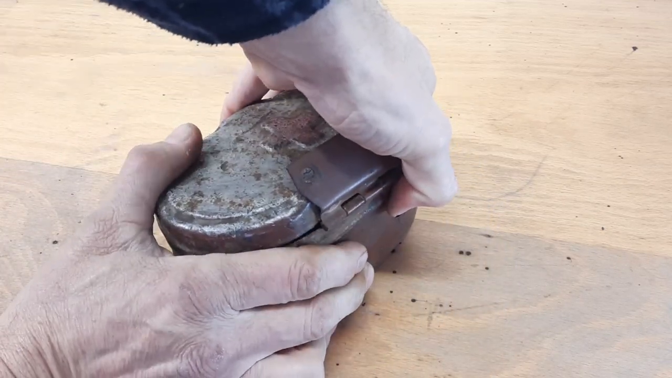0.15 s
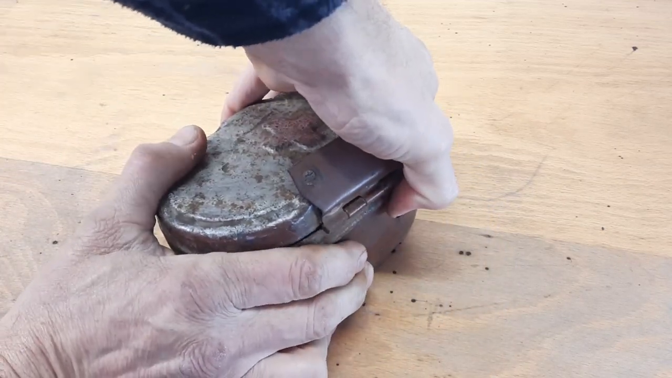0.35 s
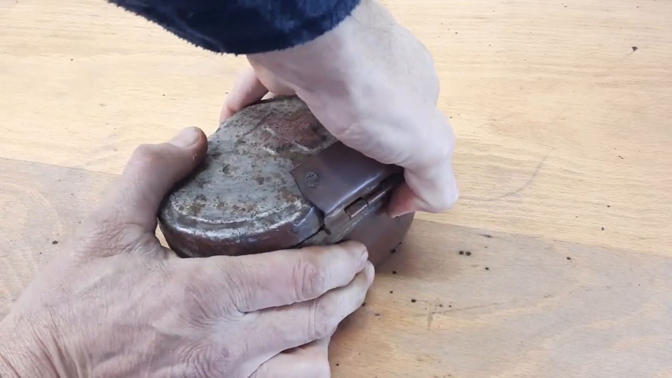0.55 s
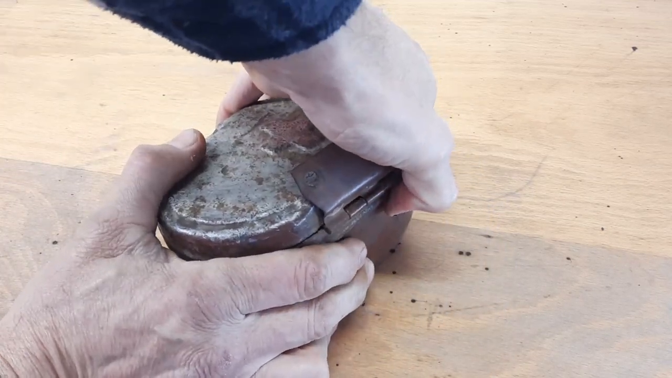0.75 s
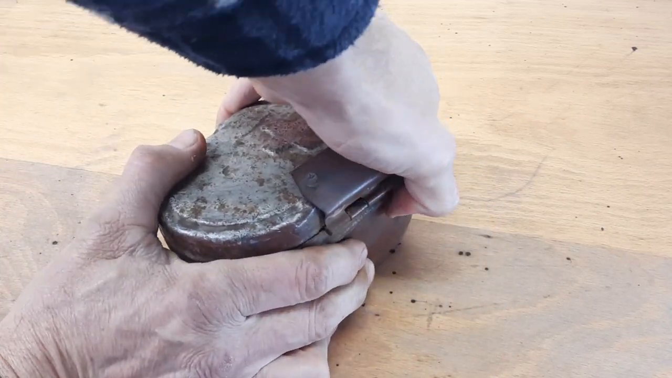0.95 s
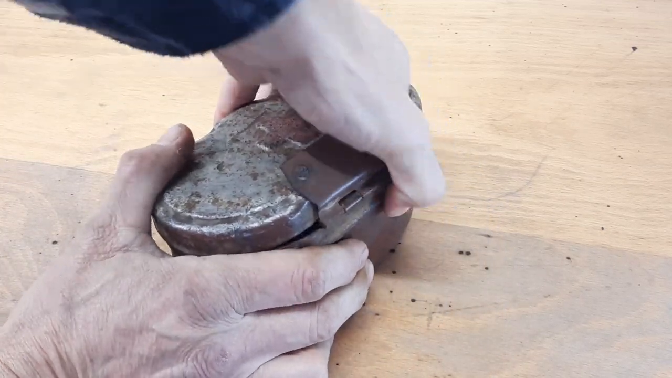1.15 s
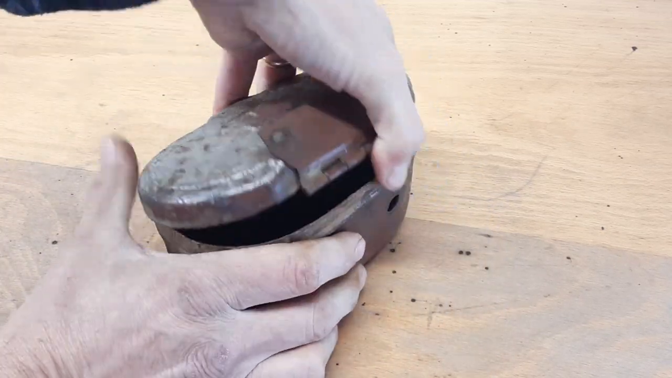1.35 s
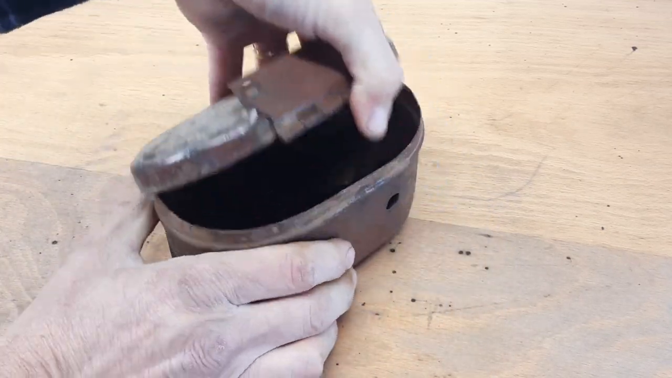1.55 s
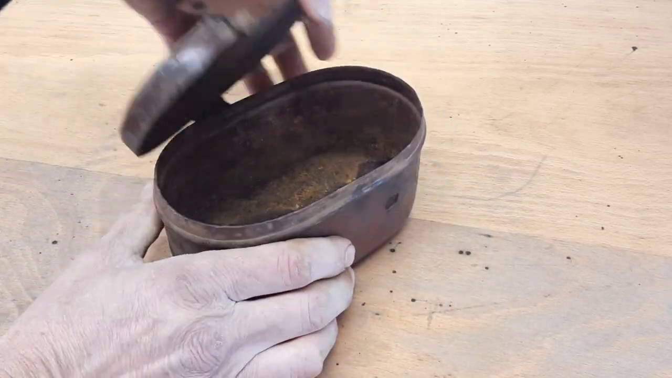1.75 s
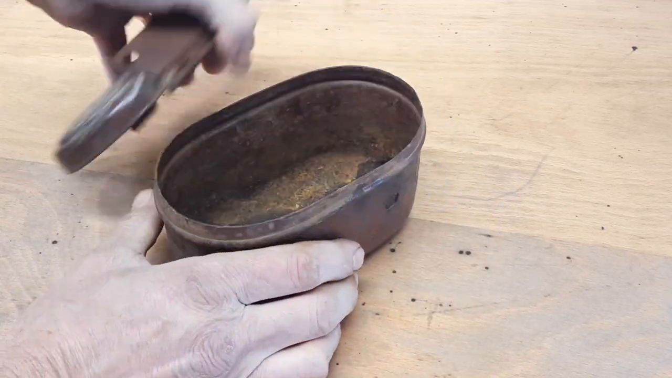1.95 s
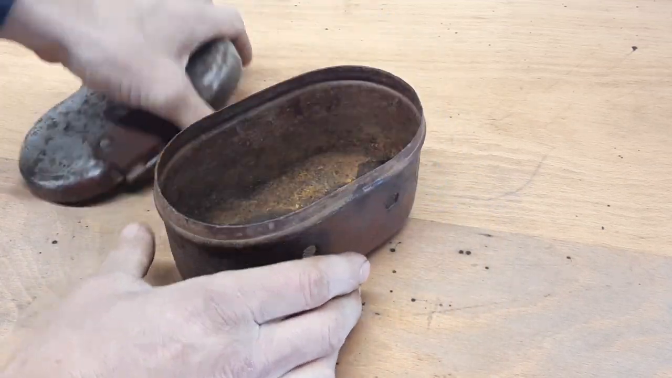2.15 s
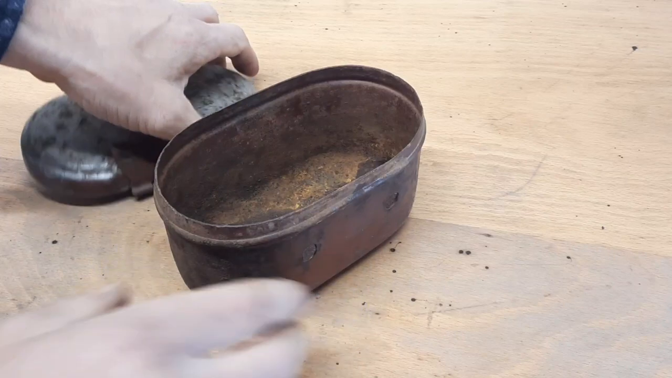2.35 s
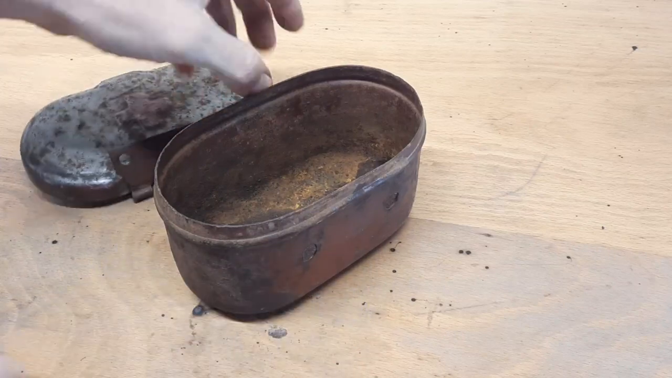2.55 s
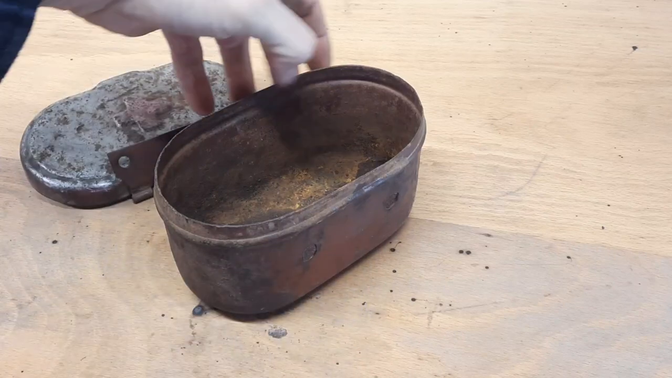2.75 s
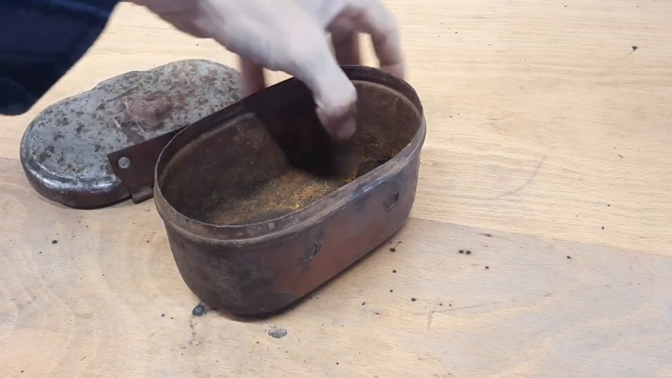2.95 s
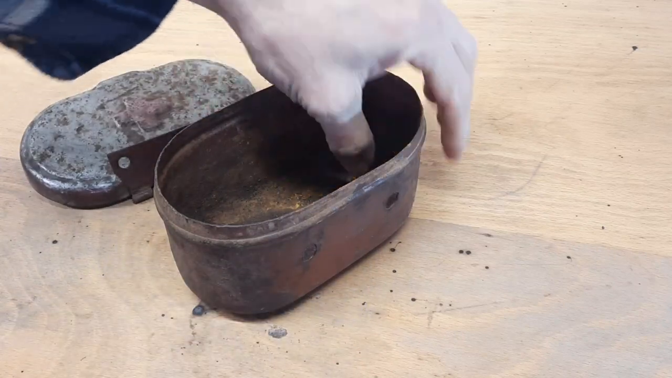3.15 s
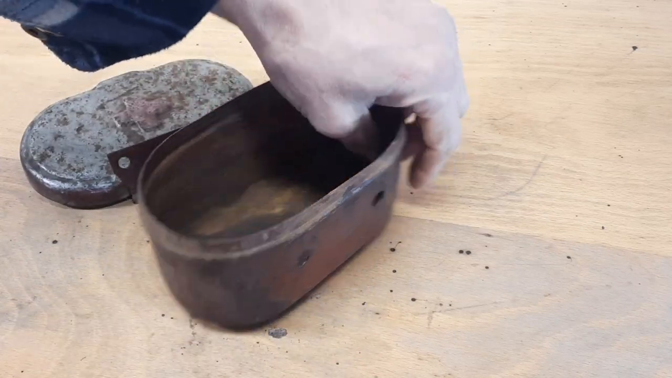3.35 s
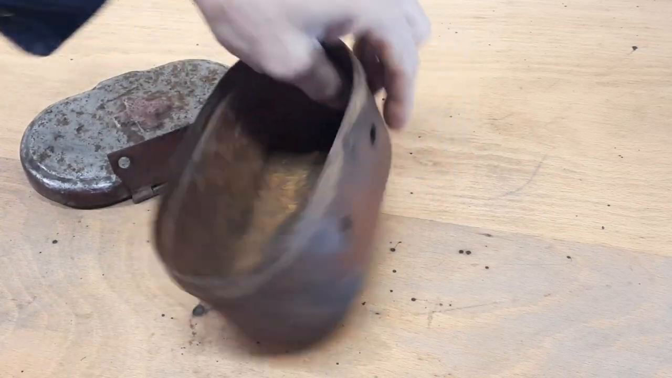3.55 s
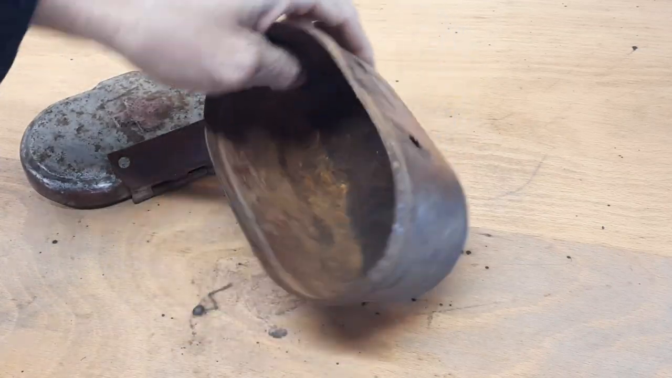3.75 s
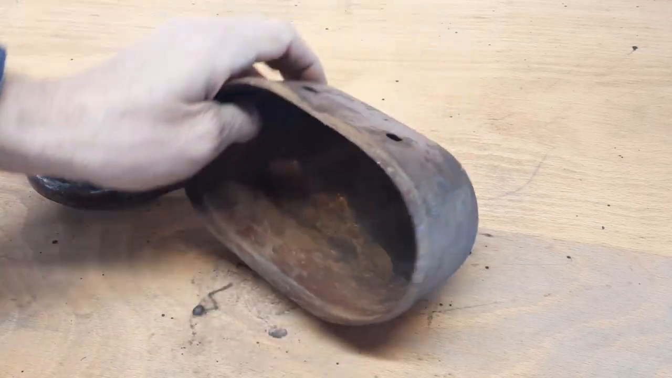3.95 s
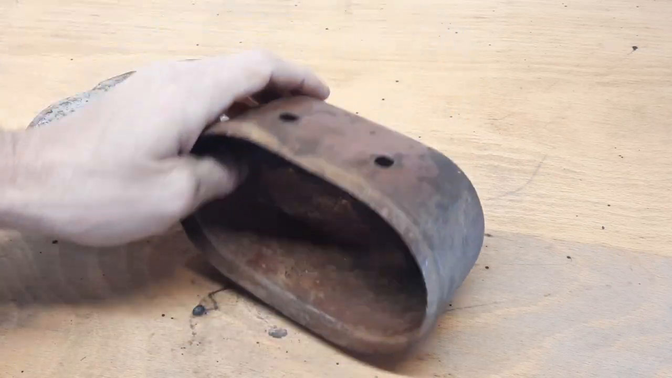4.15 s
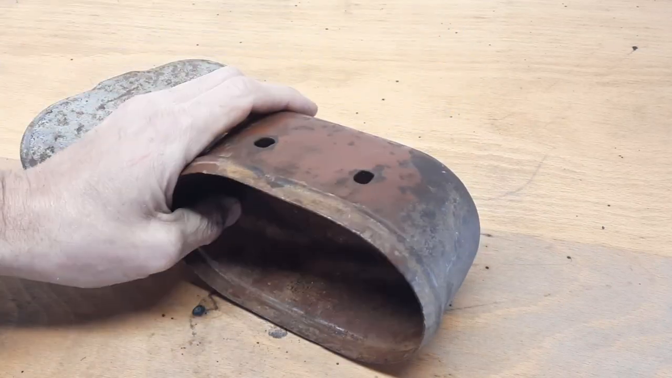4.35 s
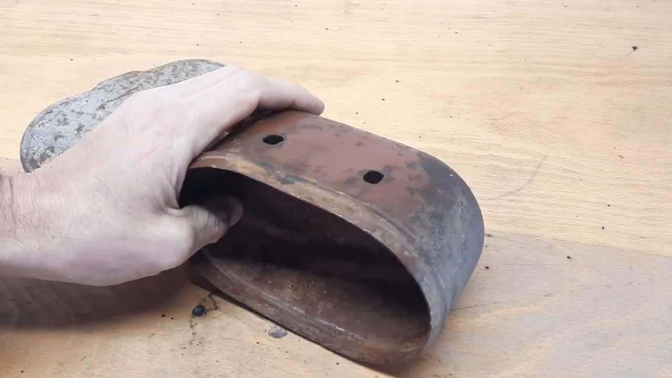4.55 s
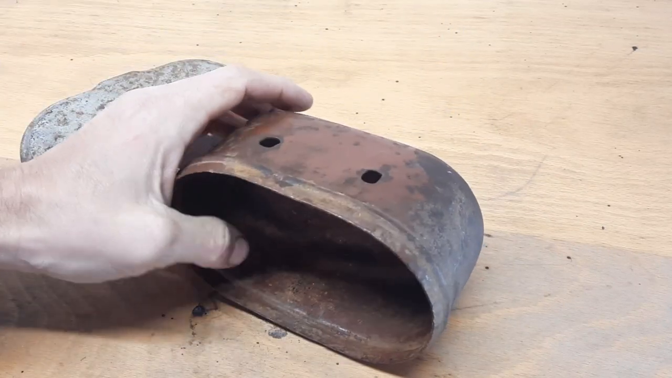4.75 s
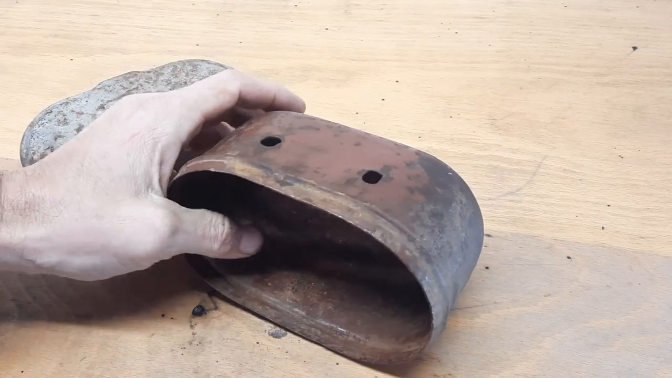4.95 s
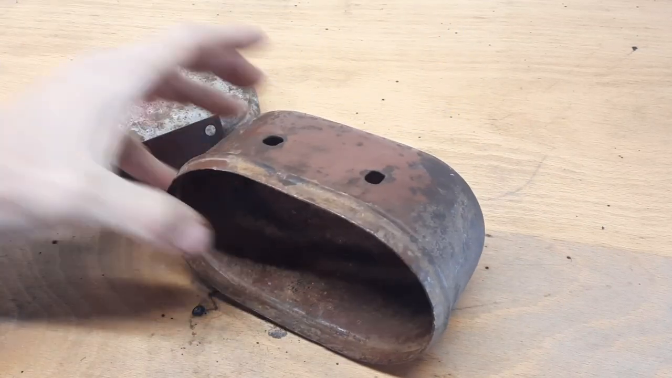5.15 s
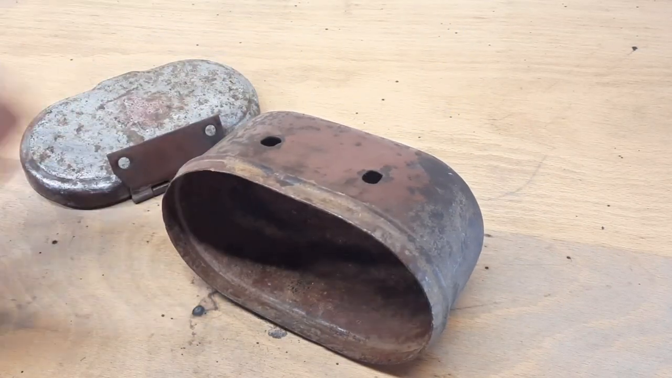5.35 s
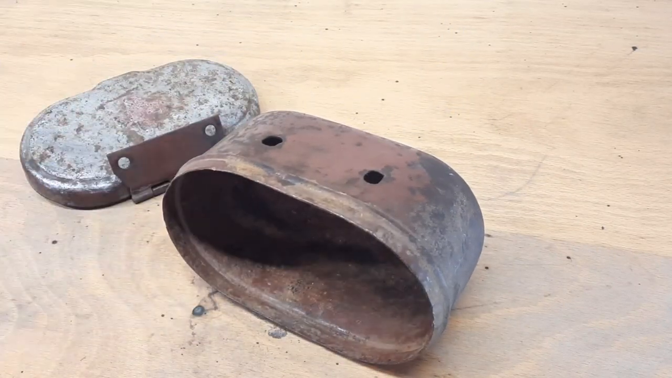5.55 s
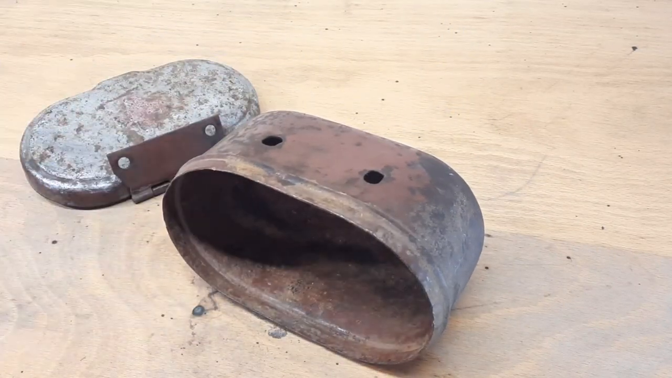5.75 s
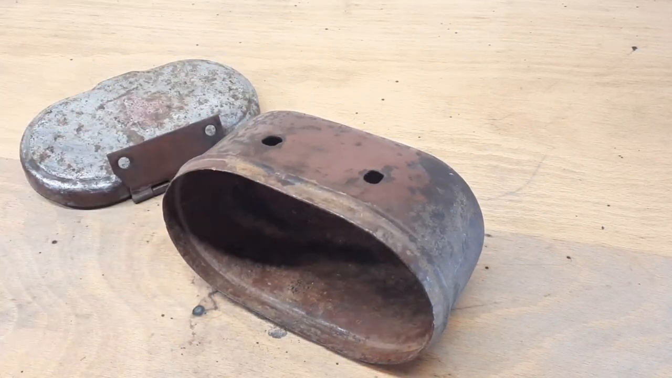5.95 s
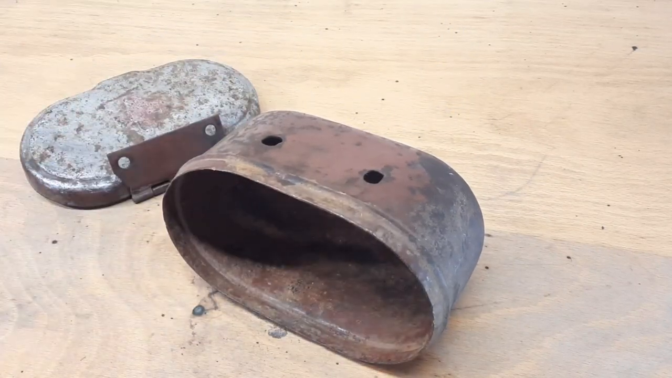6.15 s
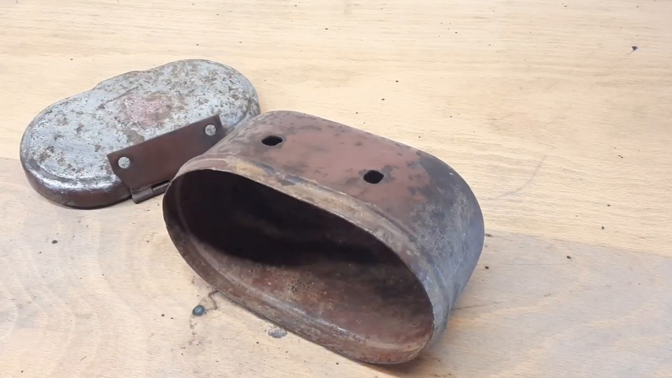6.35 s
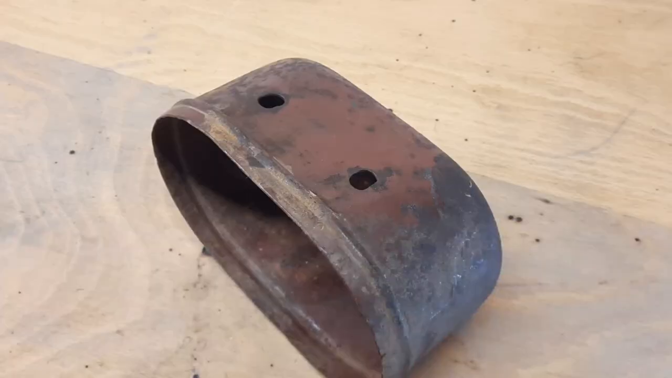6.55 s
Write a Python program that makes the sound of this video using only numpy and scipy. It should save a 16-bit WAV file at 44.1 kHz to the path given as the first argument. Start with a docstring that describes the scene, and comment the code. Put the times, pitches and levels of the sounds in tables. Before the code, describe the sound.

Rusty sheet metal scrapes and squeaks as a tight lid is worked off an old tin, heard close up in a quiet small room. Several sharp clanks and a quick rattle follow as the lid is put down on a wooden bench. The tin grates across the wood, knocks over onto its side and slides with a few more dull clanks. It ends with a very faint rustle of a sleeve.

```python
"""In a small room, close to a wooden workbench, the lid of a rusty oval tin is prised off.
It scrapes and squeaks by stick-slip friction, clinks, is put down and rocks to rest. The tin is then
dragged, tipped onto its side and slid about. Each impact excites the damped normal modes of the
sheet metal and makes the bench boom. At the end a sleeve swishes softly."""
import sys
import numpy as np
from scipy import signal
from scipy.fft import rfft, irfft
from scipy.io import wavfile
from scipy.ndimage import map_coordinates

SR = 44100
rng = np.random.default_rng(int(sys.argv[2]) if len(sys.argv) > 2 else 0)


def to_wav(s):
    """Save 16-bit WAV."""
    ch = np.atleast_2d(s).T  # columns
    pcm = np.round(np.clip(ch, -1, 1) * 32767)  # PCM
    wavfile.write(sys.argv[1], SR, pcm.astype(np.int16))


N = 291501
RING, ONSET = int(.85 * SR), 1024  # samples in an impulse response, and in the part that sets its level

# Spectra of room noise, cloth, and the bench's knock and soft bumps: f/Hz, level/dB
AIR_SPECTRUM = [(15, -31), (25, -1), (66, -1), (264, -14), (488, -18), (1030, -30), (1310, -28),
                (2630, -32), (3930, -36), (15000, -37)]
CLOTH_SPECTRUM = [(200, -6), (600, -1), (1300, -1), (2000, 1.5), (3000, -6.5), (4600, -19), (7000, -19.5),
                  (12000, -30)]
KNOCK_SPECTRUM = [(35, -33.5), (65, -4), (150, 6.5), (330, -7.5), (520, -10), (1200, -27.5), (4000, -71)]
BUMP_SPECTRUM = [(25, -16), (50, -5), (78, 3.5), (115, -14), (220, -12.5), (400, -26.5), (1000, -41),
                 (4000, -66.5)]
# Spectra of the clack, the dense and quickly damped vibration of the sheet: f/Hz, level/dB
LID_CLACK = [(100, -16), (330, -9), (520, 2), (650, -2), (1000, 0), (1280, 5.5), (1600, 0), (1830, -8),
             (2100, 0), (2450, -1), (2750, 4), (3050, -2), (3320, -10), (3600, -6), (4200, -12),
             (5700, -11), (7200, -13), (10000, -27), (15000, -50)]
TIN_CLACK = [(30, -18.5), (100, 1), (300, 2.5), (550, -7), (900, -2), (1300, -8), (2000, -0.5), (2900, 4),
             (4500, -2.5), (7000, -2.5), (10000, -12.5), (13000, -26), (15000, -36)]
# Friction spectra of skin on rust, the rusty lid, and the tin's foot and side on wood: f/Hz, level/dB
SKIN_FRICTION = [(150, -49), (600, 9), (1500, 4), (2800, -4.5), (4500, -15), (12000, -91)]
LID_FRICTION = [(150, -14.5), (500, -1), (1000, -1.5), (2300, 2), (4000, -9), (6000, -22.5), (12000, -27.5)]
FOOT_FRICTION = [(150, 14.5), (300, -24.5), (550, 15), (1000, 9), (2000, 0), (3000, -3), (4200, -22.5),
                 (6000, -7), (12000, -17.5)]
SIDE_FRICTION = [(150, 13.5), (300, -25), (550, 11.5), (1000, 15), (2000, 7.5), (3200, 1.5), (5000, -12.5),
                 (12000, -48)]
# Normal modes of the bench, the stiff rim, the tin and the lid's flat top: f/Hz, level/dB, T60/s
BENCH_MODES = [(70, -1, .25), (84, -9, .28), (107, -4, .12), (150.3, 0.5, 0.23), (153, -7.5, .18),
               (189.5, -5.5, .18), (227.4, 1, 0.11), (297.8, 1, 0.13), (348, -6, 0.06), (520, -7, .18)]
RIM_MODES = [(759, -11, .6), (1082, -8, .25), (1362, -14.5, 1.1), (1518, -7, .22), (1666, 1, .24),
             (1986, -13, .95), (2175, -7, .22), (2266, -12, .3), (2482, -15, .67), (2998, -2, .28),
             (3140, -6, .15), (3435, -8, .3), (3661, -12, .16), (4086, -11, .3), (4250, -11, .16),
             (4490, -13, .14), (5136, -7, .16), (5615, -4.5, .15), (6170, -10, .13), (6374, -6, .2),
             (7354, -13, .14), (8576, -15, .16)]
TIN_MODES = [(287, -1, .2), (525, -.5, 0.06), (554.2, -8, 0.2), (875, -6, 0.33), (1214, -11, 0.16),
             (1332, -8, 0.18), (1512, -6, 0.13), (1852, 0, 0.0564), (1952, -3, 0.16), (2059, -3, 0.14),
             (2300, -3, .12), (2690, -1, .08), (2950, 0, .16), (3090, -5, .24), (4010, -1, .12),
             (4810, -6, .12), (5290, -3, .11), (6010, -7, .1), (6660, -6, .1), (7570, -5, .11),
             (8240, -5, .07)]
LID_MODES = [(772, -8, .35), (974, -7, .2), (1049, -1, .55), (1104, -7, .2), (1147, 2, .15), (1237, 4, .12),
             (1302, 6, .12), (1505, -3, .16), (2035, -7, .1), (2222, -2, .2), (2320, -7, .18),
             (2631, 4, .08), (2760, 7, .04), (3135, -10, .15), (3526, 0, .1), (4086, -9, .12),
             (4412, -10, .2), (5830, -9, .1), (7030, -11, .12)]
# Sleeve swishes as the arm draws away: t/s of peak speed, half-length/s, level/dB
SWISHES = [(5.714, .012, -73), (5.879, 0.17, -74.5), (6.053, 0.12, -72), (6.349, 0.14, -70)]
# Low bench rumbles as the tin drags and slides and the hands shift: t/s, length/s, level/dB
RUMBLES = [(3.55, .12, -47), (4.47, .11, -47), (4.81, 0.21, -57), (5.098, 0.66, -61), (6.081, 0.216, -68.5)]
# Squeaks of tight metal: t/s, length/s, initial f/Hz, glide/(Hz/s), level/dB, relative pitch deviation
SQUEAKS = [(1.404, .027, 2850, -14000, -42, .05), (1.445, .010, 1850, 20000, -38, .04),
           (1.564, .10, 2226, 300, -44, .014), (3.405, .065, 2800, 2500, -40, .03)]
# Strokes of fingers on the tin, the lid on rim, fingers and bench, and the tin's foot and side on wood:
# t/s, length/s, load swell/dB, scrape/dB, bench rumble/dB, rust grit/dB
FINGER_RUBS = [ (.12, 0.24, 6, -79.5, -73, -95), (.52, 0.2, 1, -79, -71, -88),
               (4.60, 0.24, -6, -69.5, -67, -79), (4.92, 0.08, 6, -69, -62, -90),
               (5.00, 0.15, -7, -70, -63, -91), ]
LID_RUBS = [ (1.01, 0.13, 20, -71.5, -56, -81), (1.138, 0.06, -6, -53.5, -48, -62),
            (1.25, 0.06, 8.5, -54, -51.5, -67), (1.312, 0.058, -2, -45.5, -38.5, -47),
            (1.405, 0.13, -3.5, -53, -46.5, -54), (1.57, 0.076, 4, -47.5, -34.5, -46.5),
            (2.00, 0.21, 8, -74.5, -76, -86.5), (2.23, 0.062, -6.5, -52, -34, -66.5),
            (2.30, 0.079, 3, -53.5, -50.5, -62.5), ]
FOOT_DRAGS = [ (3.30, 0.083, 13, -65, -66.5, -80), (3.405, 0.049, 0.5, -35.5, -40, -43.5),
              (3.455, 0.08, -4.5, -44.5, -40.5, -52), (3.535, 0.058, 11.5, -34.5, -34, -44.5),
              (3.595, 0.059, 1, -32.5, -33, -50.5), (3.655, 0.023, -3.5, -40.5, -49, -59),
              (3.76, 0.029, 1, -63, -67.5, -73.5), (3.885, 0.048, 9.5, -66.5, -68, -72.5), ]
SIDE_SLIDES = [ (4.02, 0.12, -3, -48.5, -38.5, -64.5), (4.21, 0.138, 0, -40.5, -35.5, -62),
               (4.35, 0.12, 2.5, -35, -37.5, -62), (4.48, 0.072, -20, -69, -44.5, -88), ]
# Clinks of the lid's rim on the tin: t/s, level/dB, tilt/(dB/octave), damping by hand or bench/(dB/s)
CLINKS = [(1.698, -31, -3.5, 230), (2.584, -49, 2, 200), (2.785, -39.5, 0, 12)]
# Impacts of tin and lid: t/s, contact brightness f/Hz, clank/dB, bench thump/dB, rim tick/dB
TIN_IMPACTS = [ (1.080, 1160, -51.5, -58, -71), (1.139, 402.7, -35, -28, -61.5),
               (1.175, 414, -48, -32.5, -59.5), (1.289, 866, -46.5, -51.5, -62),
               (1.311, 990, -36.5, -33, -55), (3.380, 2010, -48.5, -44, -51),
               (3.437, 2950, -39, -35.5, -47.5), (3.640, 2370, -32, -34, -51), (3.676, 2350, -39, -55, -62),
               (3.9385, 616, -20, -23, -63), (3.9525, 617, -26.5, -27, -53), (4.069, 1410, -41.5, -36, -54),
               (4.116, 1520, -42, -73, -55.5), (4.176, 2380, -40, -47, -53.5),
               (4.2065, 2640, -35.5, -36.5, -47.5), (4.245, 1550, -33.5, -36, -49.5),
               (4.348, 1240, -28, -29, -68), (4.364, 406.6, -25.5, -29, -68),
               (4.812, 429, -73.5, -51.5, -97), (4.901, 444, -63, -52, -92), (4.967, 600, -67, -52, -89),
               (5.280, 601, -72, -66, -96), ]
LID_IMPACTS = [ (1.4005, 2900, -37.5, -50.5, -49), (1.448, 2030, -46, -39, -53.5),
               (1.698, 1600, -33, -31, -33), (2.180, 1400, -30, -26.5, -45), (2.187, 2000, -33, -33, -48),
               (2.197, 580, -29.5, -27, -46.5), (2.392, 1165, -34, -25.5, -55.5),
               (2.419, 1940, -19, -19, -44.5), (2.5422, 2750, -18, -23, -50),
               (2.560, 1260, -28.5, -29, -45), (2.584, 1100, -34, -51.5, -44),
               (2.6215, 1900, -20.5, -22, -49), (2.696, 2290, -28, -24.5, -53.5),
               (2.7435, 1290, -29, -26.5, -53.5), (2.785, 3150, -42.5, -46, -56.5),
               (2.801, 880, -36, -31, -45.5), ]


def undb(db):
    """Amplitude ratio of a level in decibels."""
    return 10 ** (np.asarray(db) / 20)


def unit(x, size=None):
    """Normalisation to unit rms over the first size samples."""
    return x / np.sqrt(np.mean(x[:size] ** 2) + 1e-24)


def add(out, x, start):
    """Superposition of x on out from a start time in seconds."""
    i = max(int(start * SR), 0)
    out[i:i + len(x)] += x[:max(N - i, 0)]


def cut(x, hz, kind, order=2):
    """Maximally flat low-pass or high-pass filter."""
    return signal.sosfilt(signal.butter(order, min(hz, SR / 3), kind, fs=SR, output="sos"), x)


def colour(x, spectrum):
    """Minimum-phase filter, obtained by folding the cepstrum of a spectrum."""
    hz, db = np.transpose(spectrum)
    grid = np.linspace(1, SR / 2, 1025)
    gain = undb(np.interp(np.log(grid), np.log(hz), db))
    cepstrum = irfft(np.log(gain))
    half = len(cepstrum) // 2
    cepstrum[1:half] *= 2
    cepstrum[half + 1:] = 0
    return signal.oaconvolve(x, irfft(np.exp(rfft(cepstrum))))[:len(x)]


def decay(t60):
    """Exponential damping by 60 dB in t60 seconds."""
    return np.exp(-np.log(1000) * np.arange(RING) / SR / t60)


def ringing(modes):
    """Free vibration: each normal mode is a damped sinusoid."""
    t = np.arange(RING) / SR
    return np.array([undb(db) * decay(t60) * np.sin(2 * np.pi * hz * t) for hz, db, t60 in modes])


def tap_response(rings, clack, clack_db, clack_t60, spot_db=1.2):
    """Modal superposition: a random striking point weights the modes; noise forms the dense clack."""
    weights = undb(spot_db * rng.standard_normal(len(rings))) * rng.choice([-1, 1], len(rings))
    dense = colour(rng.standard_normal(RING) * decay(clack_t60), clack)
    return unit(weights @ rings, ONSET) + undb(clack_db) * unit(dense, ONSET)


def excite(force, response):
    """Forced vibration: the force is convolved with an impulse response of unit energy."""
    return signal.fftconvolve(force, response / np.linalg.norm(response))


def slips(size, rate, spread_db):
    """Stick-slip: surfaces catch and let go in random, uneven impulses, on average rate per second."""
    clicks = (rng.random(size) < rate / SR) * rng.choice([-1, 1], size)
    strength = undb(spread_db * np.minimum(rng.exponential(size=size), 4))
    return unit(clicks * strength)


def stroke(start, length, swell_db=0, attack_s=.003, release_s=.013):
    """Normal load of one stroke: a quick rise, a hold that swells or sags, an exponential release."""
    t = np.arange(int((length + .2) * SR)) / SR
    attack = 1 - np.exp(-t / attack_s)
    hold = undb(swell_db * (np.minimum(t / length, 1) - .5))
    release = np.exp(-np.maximum(t - length, 0) / release_s)
    load = np.zeros(N)
    add(load, attack * hold * release, start)
    return load


def air(level_db=-72):
    """Stationary random noise of the still room, strongest in the bass."""
    return unit(colour(rng.standard_normal(N), AIR_SPECTRUM)) * undb(level_db)


def room(x, near_db=-7, tail_db=-6):
    """Reflection and reverberation: one echo from a near surface, then a short tail, thin in the bass."""
    noise = rng.standard_normal(RING)
    tail = cut(noise, 170, "low") * decay(t60=.3) + cut(noise, 780, "high") * decay(t60=.18)
    tail = cut(tail, 170, "high")
    out = x.copy()
    add(out, undb(near_db) * cut(x, 1600, "high", order=1), start=.003)
    add(out, undb(tail_db) * excite(x, tail), start=.01)
    return out


def sleeve(hiss_db=-9, hiss_hz=3200):
    """Friction of threads: the rustle grows with the arm's speed, the hiss with its square."""
    t, out = np.arange(N) / SR, np.zeros(N)
    rustle = unit(colour(slips(N, rate=2500, spread_db=2), CLOTH_SPECTRUM))
    cloth_noise = colour(rng.standard_normal(N), CLOTH_SPECTRUM)
    hiss = unit(cut(cloth_noise, hiss_hz, "high", order=4))
    for peak_s, half_s, db in SWISHES:
        speed = np.exp(-((t - peak_s) / half_s) ** 2)
        out += undb(db) * speed * (rustle + undb(hiss_db) * speed * hiss)
    return out


def bench_rumble():
    """Structure-borne sound: the dragged and slid tin and the shifting hands send faint, irregular bumps
    through the bench."""
    load = sum(undb(db) * stroke(start, length) for start, length, db in RUMBLES)
    force = slips(N, rate=220, spread_db=1.4) * load
    filter_gain = np.linalg.norm(colour(signal.unit_impulse(RING), BUMP_SPECTRUM))
    return colour(force, BUMP_SPECTRUM) / filter_gain


def bench_boom(clack_db=-2, clack_t60=.27):
    """Sounding-board action: the bench top radiates its low modes over a dull knock."""
    boom = tap_response(ringing(BENCH_MODES), KNOCK_SPECTRUM, clack_db, clack_t60)
    return cut(boom, 57, "high", order=5)


def squeaks():
    """Friction-induced oscillation: sliding metal chatters at an unsteady, gliding pitch."""
    t, out = np.arange(N) / SR, np.zeros(N)
    waver, grip = (unit(cut(rng.standard_normal(N), 300, "low")) for _ in range(2))
    for start, length, hz, glide, db, deviation in SQUEAKS:
        pitch = (hz + glide * np.clip(t - start, 0, length)) * (1 + deviation * waver)
        chatter = unit(np.sin(2 * np.pi * np.cumsum(pitch) / SR) * np.abs(grip))
        out += chatter * undb(db) * stroke(start, length, release_s=.008)
    return out


def flexing(x, sway_s, rate_hz=12):
    """Frequency modulation: a wandering delay shifts the resonances as the loaded sheet flexes."""
    sway = sway_s * unit(cut(rng.standard_normal(N), rate_hz, "low", order=4))
    return map_coordinates(x, [np.arange(N) + sway * SR], order=3)


def rubbing(strokes, rings, clack, friction, hand_t60, clack_db, rate, spread_db,
            sway_s=.0001, bench_hz=110, grit_hz=4600, spots=3):
    """Stick-slip friction at a few contact spots drives the hand-damped sheet and the bench."""
    out, envelopes = np.zeros(N), np.zeros((3, N))
    for start, length, swell_db, scrape_db, rumble_db, grit_db in strokes:
        load = stroke(start, length, swell_db)
        even = stroke(start, length)  # rust crackles evenly through a stroke
        envelopes += [undb(scrape_db) * load, undb(rumble_db) * load, undb(grit_db) * even]
    first, last = np.flatnonzero(envelopes[0])[[0, -1]]
    scrape, rumble, grit = envelopes[:, first:last]
    # The load wanders between the spots at constant total power.
    shares = np.abs(cut(rng.standard_normal((spots, len(scrape))), 16, "low")) + 1e-9
    shares /= np.linalg.norm(shares, axis=0)
    forces = [share * slips(len(scrape), rate, spread_db) for share in shares]
    for force in forces:
        metal = tap_response(rings, clack, clack_db, clack_t60=.012) * decay(hand_t60)
        add(out, excite(force * scrape, colour(metal, friction)), first / SR)
        add(out, excite(force * grit, cut(metal, grit_hz, "high", order=4)), first / SR)
    out = flexing(out, sway_s)
    board = cut(bench_boom(clack_db=-1.5, clack_t60=.022), bench_hz, "high")
    add(out, excite(sum(forces) * rumble, board), first / SR)
    return out


def clinks():
    """Hard contact of metal on metal excites the rim's clear partials, which linger if lightly damped."""
    out, rings = np.zeros(N), ringing(RIM_MODES)
    octaves = np.log2(np.array(RIM_MODES)[:, 0] / 3000)
    for start, db, tilt, damping in CLINKS:
        weights = undb(db + tilt * octaves) * rng.choice([-1, 1], len(rings))
        add(out, weights @ rings * undb(-damping * np.arange(RING) / SR), start)
    return out


def rocking(start=2.8315, gap_s=.0318, limp_s=.01, contact_hz=560, count=6):
    """Dissipation: impact rows of the lid rocking to rest, each weaker, every second one late."""
    first_db = np.array([-34, -28, -62])  # clank, bench thump, rim tick
    fall_db_per_s = np.array([172, 98, 197])
    delays = [k * gap_s + k % 2 * limp_s for k in range(count)]
    return [(start + delay, contact_hz, *(first_db - delay * fall_db_per_s)) for delay in delays]


def crack(contact_hz, clack, t60=.014, band_ratio=1.2):
    """Contact transient: the struck spot buzzes briefly in a band around the contact frequency."""
    burst = colour(rng.standard_normal(RING) * decay(t60), clack)
    burst = cut(burst, contact_hz / band_ratio, "high", order=4)
    return unit(cut(burst, contact_hz * band_ratio, "low", order=6), ONSET)


def impacts(table, rings, clack, let_go_s, hand_t60, clack_db, clack_t60, flex_s,
            cutoff_ratio, crack_db, sheet_hz, tick_hz=5000):
    """Impulse excitation: soft contact rings the lower modes, the hard rim the top; the bench booms."""
    out = np.zeros(N)
    rise = np.minimum(np.arange(RING) / SR / flex_s, 1)  # thin sheet gives way before it rings fully
    for start, contact_hz, clank_db, thump_db, tick_db in table:
        metal = tap_response(rings, clack, clack_db, clack_t60) * rise
        if start < let_go_s:  # the hand damps the ring
            metal *= decay(hand_t60)
        softened = cut(metal, cutoff_ratio * contact_hz, "low")
        body = unit(cut(softened, sheet_hz, "low", order=3), ONSET)
        tick = unit(cut(metal, tick_hz, "high", order=3), ONSET)
        thump = unit(bench_boom(), ONSET)
        clank = body + undb(crack_db) * crack(contact_hz, clack)
        add(out, undb(clank_db) * clank + undb(tick_db) * tick + undb(thump_db) * thump, start)
    return out


def scene():
    """Linear superposition of lid, tin, bench and sleeve in the room, over quiet air."""
    lid, tin = ringing(LID_MODES), ringing(TIN_MODES)
    direct = impacts(LID_IMPACTS + rocking(), lid, LID_CLACK, let_go_s=2.41, hand_t60=.42, clack_db=3.5,
                     clack_t60=.048, flex_s=.002, cutoff_ratio=1.45, crack_db=-1, sheet_hz=4000)
    direct += impacts(TIN_IMPACTS, tin, TIN_CLACK, let_go_s=5.2, hand_t60=.306, clack_db=1.5,
                      clack_t60=.073, flex_s=.0015, cutoff_ratio=.98, crack_db=-9.5, sheet_hz=3500)
    direct += rubbing(LID_RUBS, lid, LID_CLACK, LID_FRICTION, hand_t60=.051, clack_db=18,
                      rate=1700, spread_db=-.5)
    direct += rubbing(FOOT_DRAGS, tin, TIN_CLACK, FOOT_FRICTION, hand_t60=.26, clack_db=-2,
                      rate=700, spread_db=4.2, sway_s=.0002, bench_hz=200, spots=4)
    direct += rubbing(SIDE_SLIDES, tin, TIN_CLACK, SIDE_FRICTION, hand_t60=.081, clack_db=1.5,
                      rate=900, spread_db=5, bench_hz=128)
    direct += rubbing(FINGER_RUBS, tin, TIN_CLACK, SKIN_FRICTION, hand_t60=.2, clack_db=0,
                      rate=2200, spread_db=3)
    return (air() + room(direct + clinks() + squeaks() + sleeve() + bench_rumble()))[None]


def record(dry, bottom_hz=22, top_hz=15700):
    """Band limiting: the microphone thins the deepest bass, clips at full scale and cuts the top."""
    sound = np.clip(cut(dry, bottom_hz, "high"), -1, 1)
    return signal.sosfilt(signal.ellip(8, .2, 70, top_hz, fs=SR, output="sos"), sound)


dry = scene()
out = record(dry)
to_wav(out)
```